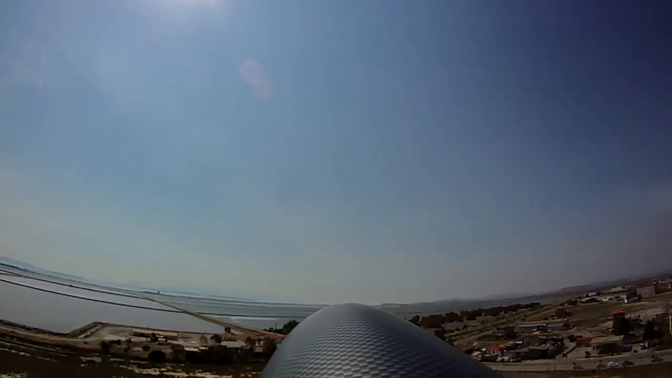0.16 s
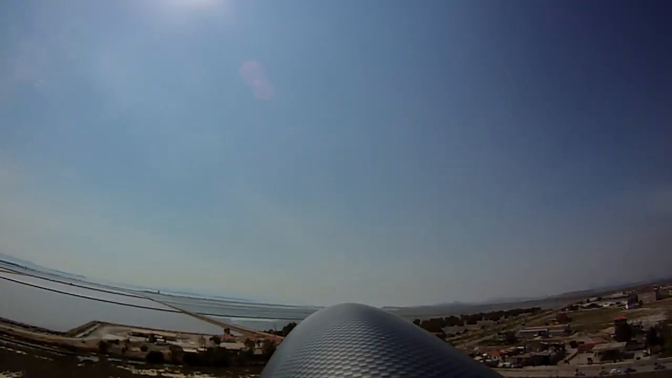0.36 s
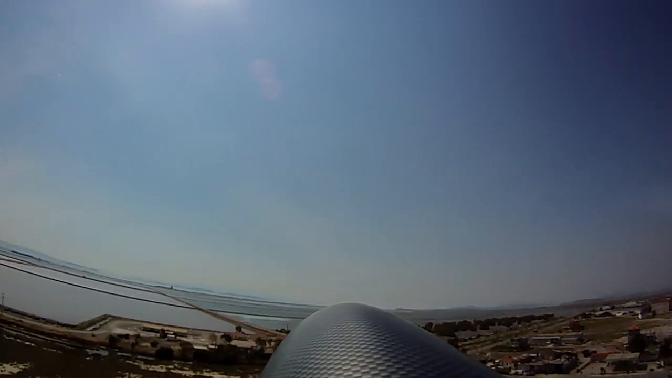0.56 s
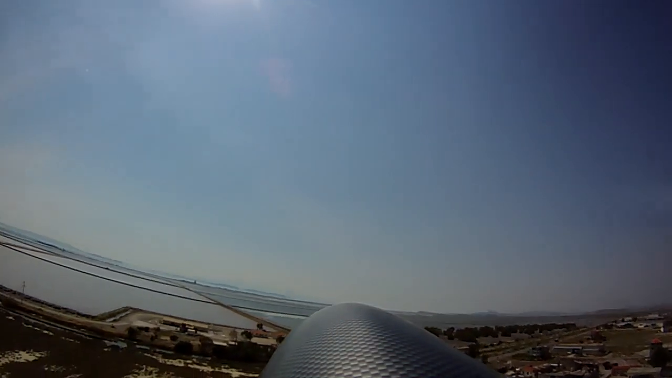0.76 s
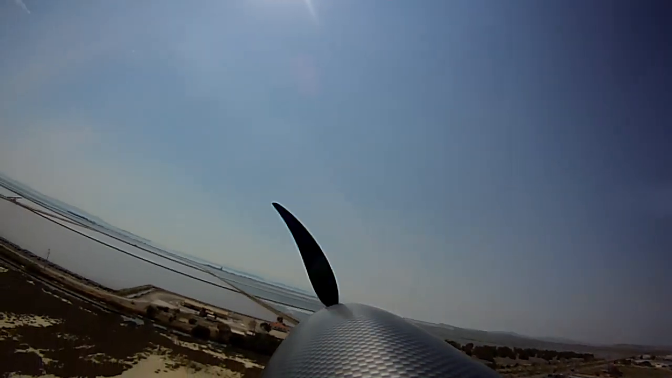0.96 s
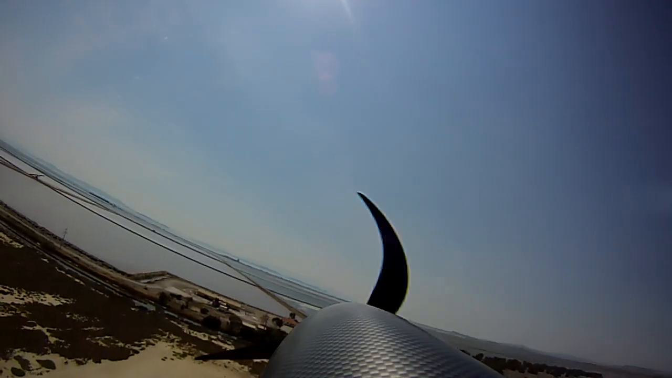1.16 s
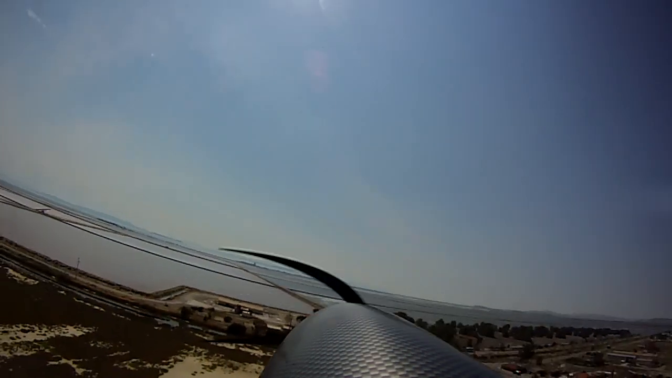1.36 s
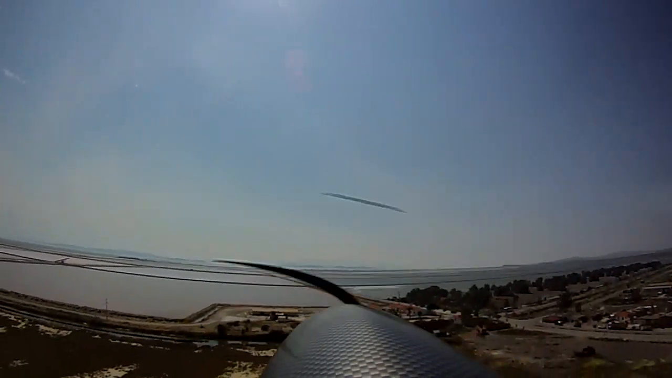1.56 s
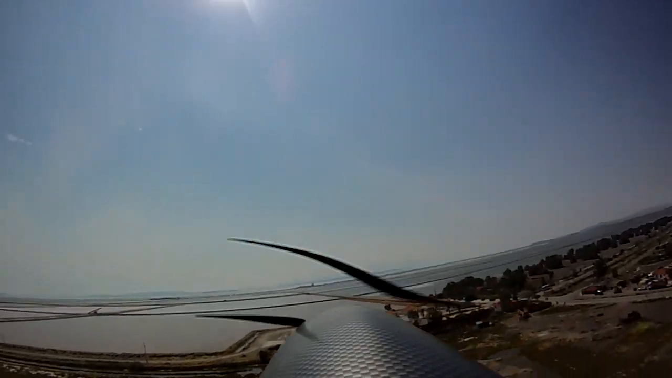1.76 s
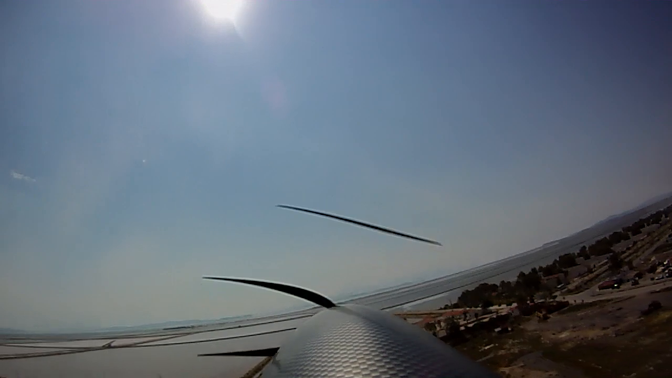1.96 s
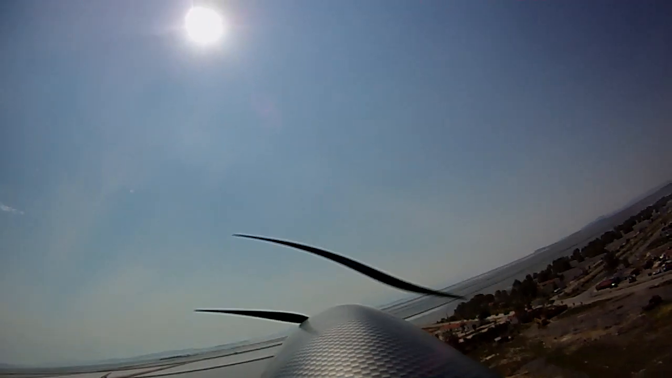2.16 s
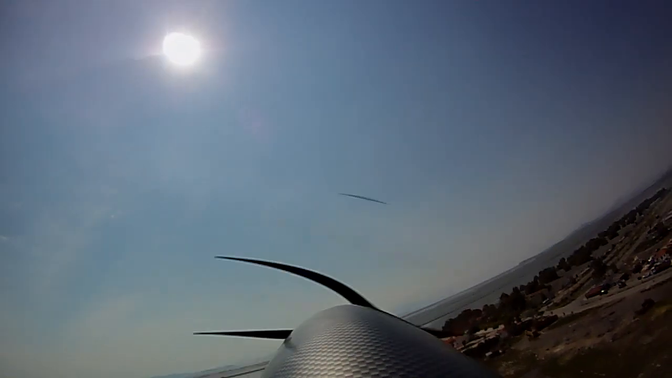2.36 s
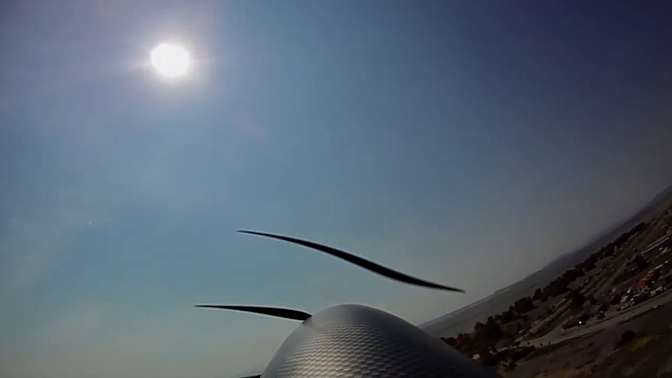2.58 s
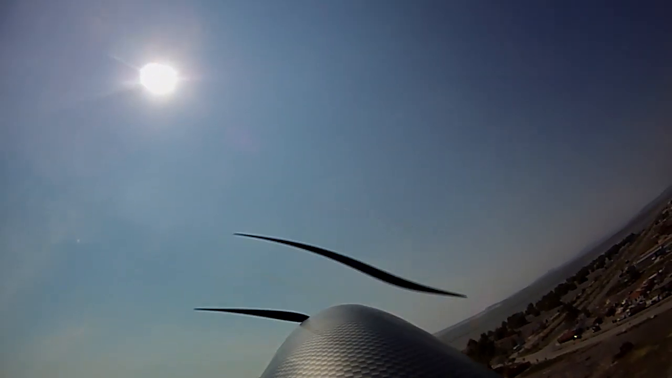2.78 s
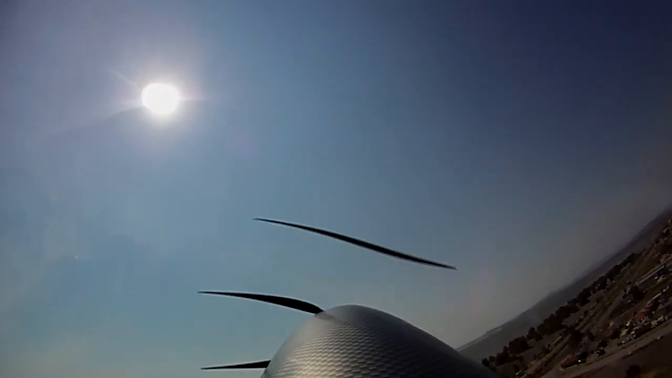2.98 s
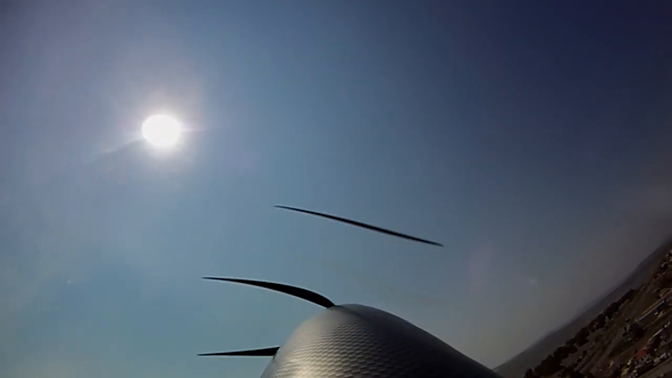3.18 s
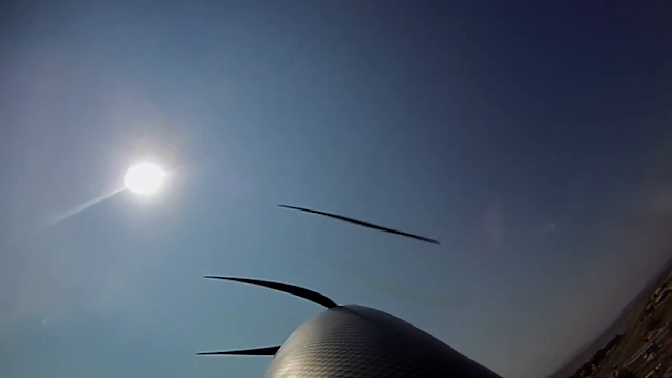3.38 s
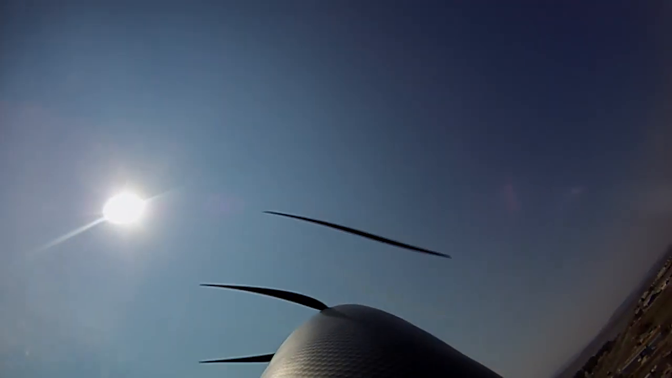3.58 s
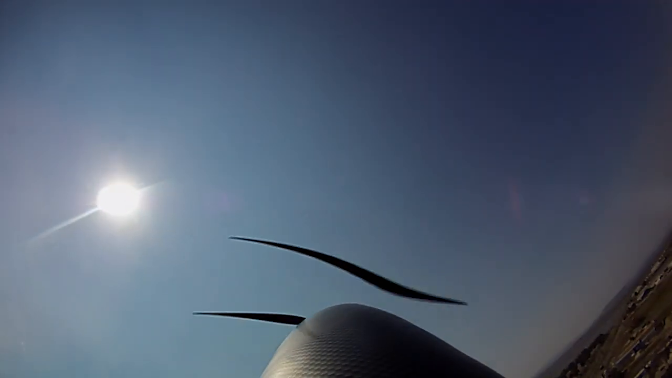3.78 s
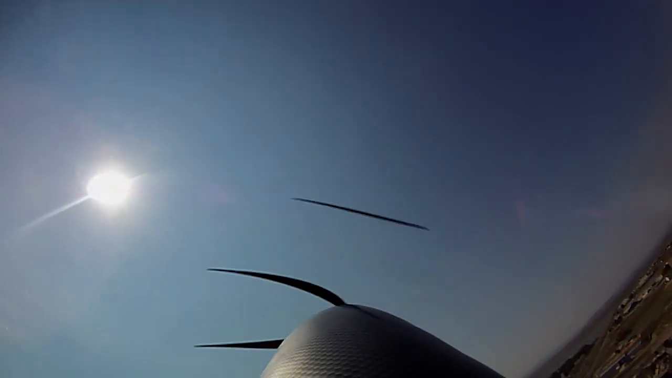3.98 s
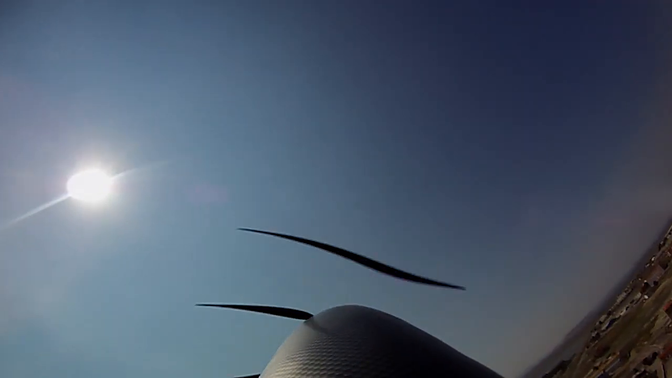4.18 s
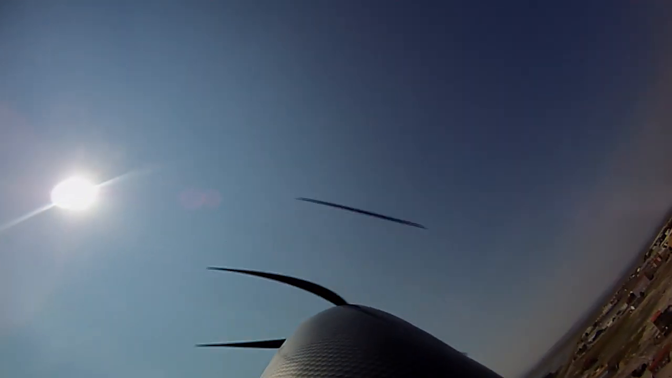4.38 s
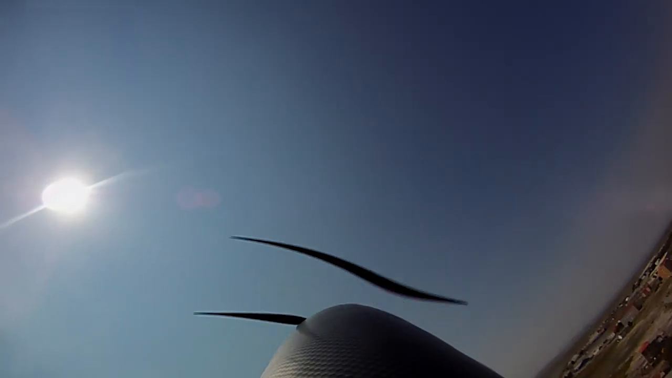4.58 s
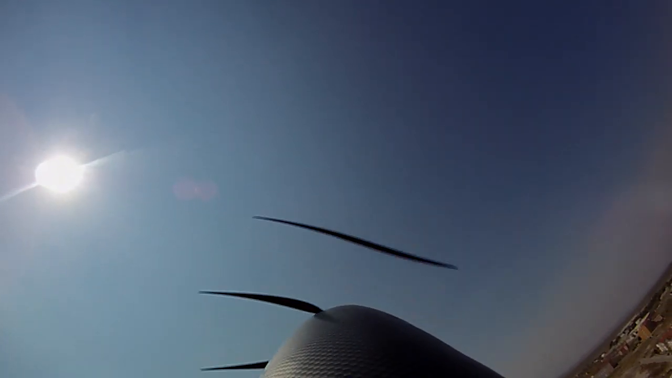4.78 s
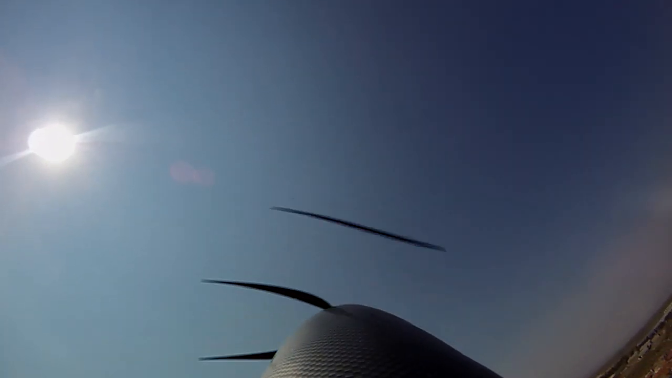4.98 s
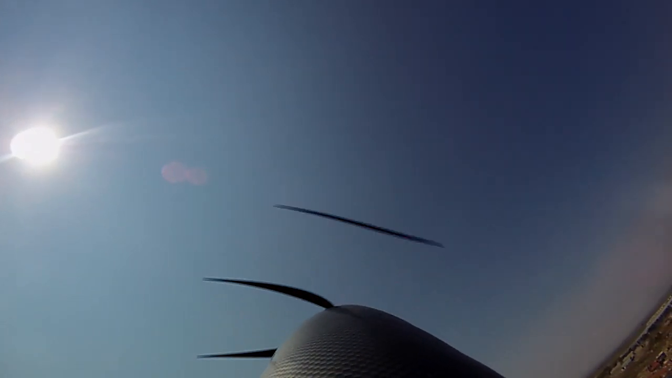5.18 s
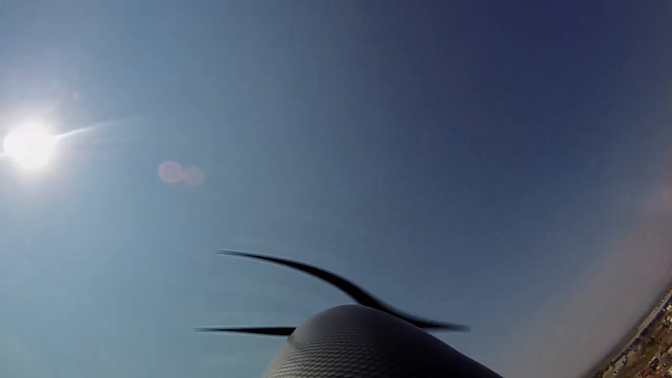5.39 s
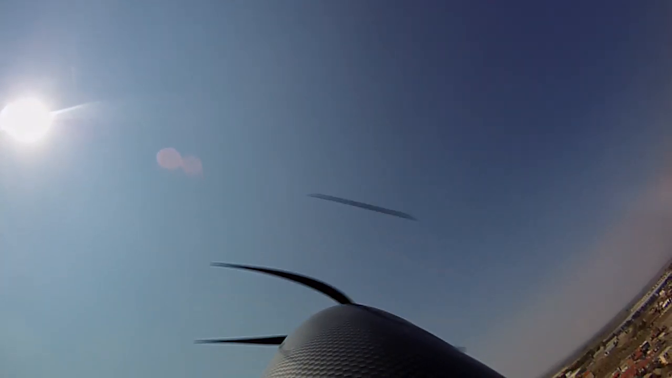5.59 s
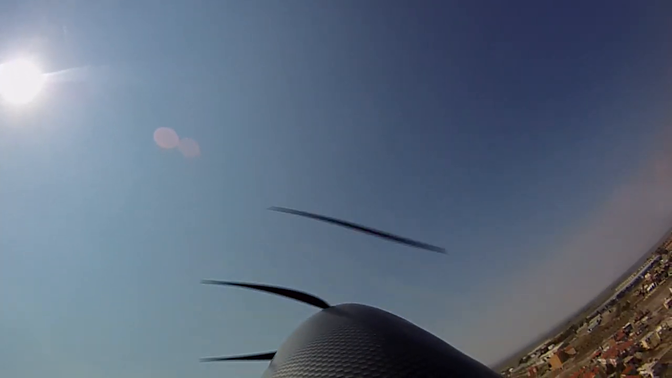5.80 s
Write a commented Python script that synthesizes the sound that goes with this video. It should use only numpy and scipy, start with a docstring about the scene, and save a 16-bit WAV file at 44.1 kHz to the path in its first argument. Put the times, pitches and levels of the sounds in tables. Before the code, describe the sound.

Low airflow flutters and fades, folding blades click open, a small motor whirs up, and a harsh, buffeting propeller drone takes over.

```python
"""Propeller wash buffets a camera microphone on the nose of a model glider: dense one-way pressure spikes,
each crest with a spit of filtered noise, over cosine tones at multiples of the two-blade rate.
Before it, close up: noise-burst clicks as the folding propeller opens, then the electric motor whining up
through the airframe as a sine sweeping across fixed resonances, with a brief buzz and the hiss of the blades.
Behind it all lie the rumble and hiss of the gliding airflow, shaped from noise, and two thin whistles."""
import sys
import numpy as np
from scipy import signal
from scipy.fft import rfft, irfft
from scipy.io import wavfile
from scipy.ndimage import uniform_filter1d

SR = 44100
rng = np.random.default_rng(int(sys.argv[2]) if len(sys.argv) > 2 else 0)


def persist_wave(psi):
    """Save psi, clipped to +-1, as 16-bit WAV."""
    counts = np.round(np.clip(psi, -1, 1) * 32767).astype(np.int16)
    wavfile.write(sys.argv[1], SR, np.atleast_2d(counts).T)


N = 257544
TIME = np.arange(N) / SR  # seconds

# Strength of the wash at the microphone as the glider banks and climbs.
# Each row: time in seconds, level at full throttle in dB.
WASH_LEVEL = [(1.65, -14.5), (1.85, -12.5), (2.2, -11.5), (2.75, -15.5), (3.15, -10), (3.42, -12),
              (3.62, -15.5), (3.95, -12), (4.2, -14.5), (4.9, -14), (5.2, -17.5), (5.84, -15)]
# Spectrum of the wash's pressure. Each row: frequency in Hz, relative density in dB per Hz.
WASH_PRESSURE_SPECTRUM = [(11, -24), (18, 3.5), (128, -4), (181, -6.5), (392, -4), (572, -10), (975, -25.5),
                          (1100, -23), (1430, -41.5), (2420, -120)]
# Spectrum of the hiss torn loose by the wash. Each row: frequency in Hz, relative density in dB per Hz.
WASH_HISS_SPECTRUM = [(500, -2.5), (950, -10.5), (1200, 4), (1500, -2), (2000, -2.5), (2400, -7),
                      (3600, -11.5), (4400, -13), (5300, -17), (6000, -17), (7600, -22), (10000, -31),
                      (11500, -38.5), (15000, -45)]
# The hardest eddies that strike the microphone.
# Each row: time in seconds, relative peak in dB, swell of the stream around it in dB (hiss in full, pressure half).
HARD_BUFFETS = [(1.6826, -1.5, 5), (1.7808, -.5, 4), (1.853, 0, 5), (2.1331, -1, 6), (2.2485, 0, 3),
                (2.4453, -1, 3), (2.5542, -2, 6), (2.6232, -3, 5), (2.7412, -3, 4), (2.89, -1, 4),
                (2.9416, -.5, 5), (3.025, -6, 7), (3.1333, 0, 6), (3.2121, -3, 4), (3.3955, -1, 4),
                (3.4374, 0, 3), (3.5183, -1.5, 5), (3.5687, -2, 4), (3.6635, -1, 4), (3.7364, 0, 5),
                (3.8755, -1, 4), (3.9823, 0, 3), (4.2497, -3, 4), (4.3489, -1, 4), (4.4224, -1, 4),
                (4.5489, -1.5, 4), (4.8523, 0, 4), (4.9666, 0, 4), (5.22, -3.5, 3), (5.3772, -6, 5),
                (5.695, -2, 4)]
# Drone of the two blades. Each row: multiple of the blade rate, level against the wash before levelling in dB.
BLADE_DRONE = [(1, -13), (2, -18), (3, -19.5), (4, -26.5)]
# How the airframe passes the motor on. Each row: frequency in Hz, relative gain in dB.
AIRFRAME_RESONANCES = [(400, -59), (780, -25), (900, -38), (1060, -26), (1230, -23), (1400, -36),
                       (1700, -38), (1900, -53), (2200, -33), (2550, -60), (2850, -39), (3200, -45),
                       (3600, -33), (3900, -49), (4800, -50), (7000, -75)]
# Start-up buzz of the motor. Each row: multiple of the commutation rate, relative level in dB.
BUZZ_PARTIALS = [(1, -4), (3, -15), (4, -7), (5, -15), (6, -10)]
# The motor sings while it pulls hard.
# In order: start in seconds, attack in seconds, end of hold in seconds, release in dB per second.
WHINE_ENVELOPE = (1.21, .025, 1.52, 70)
# The start-up buzz of the motor comes and goes.
# In order: start in seconds, attack in seconds, end of hold in seconds, release in dB per second.
BUZZ_ENVELOPE = (1.225, .04, 1.352, 380)
# Smooth hiss of the blades themselves. Each row: frequency in Hz, relative density in dB per Hz.
BLADE_HISS_SPECTRUM = [(600, -38), (1200, 7), (4000, -2.5), (8000, -13.5), (11000, -22), (15000, -28.5)]
# The blades knock in their hinges. Each row: time in seconds, peak in dB, centre in Hz, width in Hz.
HINGE_KNOCKS = [(.889, -48, 7300, 2500), (.985, -35, 1700, 1200), (.997, -30, 1900, 1400),
                (2.958, -11, 2900, 2000)]
# Airflow as the gliding airframe slows down.
# Each row: time in seconds, relative rumble level in dB, relative hiss level in dB.
GLIDE_LEVELS = [(0, -25.5, -46.5), (.2, -29, -49.5), (.55, -32, -55.5), (.85, -32, -55.5),
                (1, -28.5, -56.5), (1.2, -30, -57)]
# Spectrum of the low flutter at the microphone. Each row: frequency in Hz, relative density in dB per Hz.
GLIDE_RUMBLE_SPECTRUM = [(12, -28.5), (20, -4), (38, -1), (86, -4), (119, -7.5), (160, -10), (198, -7.5),
                         (339, -15), (528, -15), (612, -17.5), (1000, -35.5), (1300, -36), (2200, -120)]
# Spectrum of the hiss from the airframe. Each row: frequency in Hz, relative density in dB per Hz.
GLIDE_HISS_SPECTRUM = [(700, -13), (950, -34), (1100, 4.5), (1230, 1), (1500, -6.5), (2400, -12),
                       (3000, -10.5), (3450, -16), (4050, -10), (4700, -18.5), (6000, -19), (6700, -30),
                       (7800, -25), (9500, -45.5)]
# Faint thin whistles in the airflow. Each row: mean frequency in Hz, rms level in dB.
WHISTLE_TONES = [(10900, -84), (13600, -81.5)]

# The shaft speeds up along an S-curve: turns per second at full throttle, moment of half speed, time constant.
FULL_HZ, HALF_SPEED_S, SPIN_UP_S = 67, 1.375, .0768
# The wash trails the shaft; pressure, hiss and blade hiss grow by so many dB for each dB of shaft speed.
WASH_LAG_S, WASH_GROWTH, HISS_GROWTH, BLADE_GROWTH = 0.052, 2.3, 3.9, 1.18
# The wash hiss: mean level before its fade, share of the wash's swings in dB, start and rate of the fade.
HISS_DB, HISS_SHARE, HISS_FADE_FROM_S, HISS_FADE_DB_PER_S = -30, 0.2, 3.1, 0.67
# Lesser eddies: mean gap, relative peak above the wash, scatter of the peak, swell.
LESSER_GAP_S, LESSER_PEAK_DB, LESSER_SCATTER_DB, LESSER_SWELL_DB = .055, 9, 1.55, 2.5
# Rates up to about which the levels wander.
DRONE_WANDER_HZ, WHINE_WANDER_HZ = 3, 60
# Gains of the motor's two voices, and level of the blade hiss at full throttle.
WHINE_DB, BUZZ_DB, BLADE_DB = -.5, -1.5, -43
# The opening blades swish through the air: moment, width of the bell curve (sigma), rise of the hiss.
SWISH_S, SWISH_WIDTH_S, SWISH_DB = .94, 0.0274, 6
TOP_HZ = 15300  # the treble is cut above this


def wash(turns, eddy_rate=1700, chop=0.19, spit=0.85, stream_db=-0.6):
    """Small eddies push on the microphone one way only; hiss flares on every pressure crest."""
    pressure_db = curves(WASH_LEVEL)[0]
    fade_db = HISS_FADE_DB_PER_S * np.maximum(TIME - HISS_FADE_FROM_S, 0)
    hiss_db = HISS_DB + HISS_SHARE * (pressure_db - pressure_db.mean()) - fade_db
    blade_phase = 2 * np.pi * 2 * turns  # two blades
    swell_db, push = buffets(HARD_BUFFETS + lesser_buffets(pressure_db))

    gust = undb(1.75 * walk(66)) * (1 + chop * np.cos(blade_phase))
    # sparse one-way impulses, eddy_rate per second on average
    eddies = (rng.random(N) < eddy_rate / SR) * rng.random(N)
    stream = steady(colour((eddies - eddies.mean()) * gust, WASH_PRESSURE_SPECTRUM))

    drone = np.zeros(N)
    for multiple, db in BLADE_DRONE:
        level = np.sqrt(2) * undb(db + 0.37 * walk(DRONE_WANDER_HZ))
        drone += level * np.cos(round(multiple) * blade_phase)

    # pressure in units of the wash's own strength
    pressure = undb(swell_db / 2 + stream_db) * stream + drone
    pressure += 1.25 * push / undb(pressure_db)
    # the microphone lets slow pressure leak away
    pressure = steady(butter(pressure, 26, "high", order=1))

    # the flow tears loose on the crests, up to a limit
    crest = 1 + 2 * spit * (1 + np.tanh(0.91 * (pressure - 1)))
    flicker_db = 1.66 * walk(81)
    hiss = colour(noise() * crest * undb(flicker_db + swell_db), WASH_HISS_SPECTRUM)
    hiss = steady(butter(hiss, 670, "high"))

    flow = speed(WASH_LAG_S)
    pressure_part = pressure * undb(pressure_db) * flow ** WASH_GROWTH
    hiss_part = hiss * undb(hiss_db) * flow ** HISS_GROWTH
    return pressure_part + hiss_part


def buffets(rows, swell_s=0.006, core_s=0.00041, suction=0.36, suction_s=0.0015, lag_s=0.0037):
    """Each eddy is a sharp push followed by a shallow suction, and stirs up the stream around it."""
    swell_db, push = np.zeros(N), np.zeros(N)
    sizes = np.exp(0.2 * rng.standard_normal(len(rows)))
    for (s, peak_db, stir_db), size in zip(rows, sizes):
        near = slice(max(int((s - .03) * SR), 0), int((s + .03) * SR))
        age = TIME[near] - s
        # the stirring comes on fast and dies away more slowly
        stir_s = np.where(age < 0, swell_s / 2, swell_s)
        swell_db[near] += stir_db * np.exp(-.5 * (age / stir_s) ** 2)
        core = np.exp(-.5 * (age / (core_s * size)) ** 2)
        trough = np.exp(-.5 * ((age - lag_s) / suction_s) ** 2)
        push[near] += undb(peak_db) * (core - suction * trough)
    return swell_db, push


def lesser_buffets(pressure_db, count=120):
    """Random eddies at uneven gaps, their peaks following the wash: rows like those of HARD_BUFFETS."""
    place, size = rng.random(count), rng.standard_normal(count)
    times = (np.arange(count) + place) * LESSER_GAP_S
    peaks_db = np.interp(times, TIME, pressure_db) + LESSER_PEAK_DB + LESSER_SCATTER_DB * size
    return [(s, db, LESSER_SWELL_DB) for s, db in zip(times, peaks_db)]


def speed(lag_s=0):
    """Shaft speed as a share of full throttle, lag_s earlier."""
    return 1 / (1 + np.exp((HALF_SPEED_S + lag_s - TIME) / SPIN_UP_S))


def motor(shaft_hz, turns):
    """Fourteen magnets and three phases give 42 tugs a turn; overtones sweep the airframe's resonances."""
    steps = 42
    # the rotor is dragged up to speed in slightly uneven steps
    phase = 2 * np.pi * steps * turns + .13 * walk(150)

    def partial(k):
        """One multiple of the tug rate, as the airframe passes it on."""
        return response(k * steps * shaft_hz, AIRFRAME_RESONANCES) * np.sin(k * phase)

    whine = partial(2) * undb(1.5 * walk(WHINE_WANDER_HZ))
    # hard commutation edges buzz only during the first moments
    buzz = np.zeros(N)
    for multiple, db in BUZZ_PARTIALS:
        buzz += undb(db + 2 * walk(WHINE_WANDER_HZ)) * partial(round(multiple))
    buzz = butter(buzz, 4000, "low", order=8)
    return whine * envelope(*WHINE_ENVELOPE, WHINE_DB) + buzz * envelope(*BUZZ_ENVELOPE, BUZZ_DB)


def blades():
    """The blades hiss as soon as they turn, before their wash has built up."""
    return colour(noise(), BLADE_HISS_SPECTRUM) * undb(BLADE_DB) * speed() ** BLADE_GROWTH


def hinges(decay_s=0.00073):
    """Blades knocking in their hinges: short decaying noise bursts, each in its own band."""
    out = np.zeros(N)
    for s, db, hz, width_hz in HINGE_KNOCKS:
        age = np.maximum(TIME - s, 0)
        burst = noise() * (age > 0) * np.exp(-age / decay_s)
        click = butter(burst, [max(hz - width_hz / 2, 100), hz + width_hz / 2], "band")
        out += undb(db) * click / np.abs(click).max()
    return out


def glide():
    """Smooth airflow: a low flutter at the microphone, hiss from the airframe and faint whistles."""
    rumble_db, hiss_db = curves(GLIDE_LEVELS)
    hiss_db = hiss_db + SWISH_DB * np.exp(-.5 * ((TIME - SWISH_S) / SWISH_WIDTH_S) ** 2)
    rumble = steady(colour(noise() * undb(0.85 * walk(35.5)), GLIDE_RUMBLE_SPECTRUM))
    hiss = colour(noise() * undb(1.46 * walk(34)), GLIDE_HISS_SPECTRUM)
    hiss = butter(hiss, 770, "high", order=4)
    hiss = butter(hiss, 14000, "low", order=4)
    floor = undb(-73) * noise()
    return rumble * undb(rumble_db + 2.5) + hiss * undb(hiss_db + 5.5) + floor + whistles()


def whistles():
    """Two thin tones in the airflow that waver together in pitch."""
    waver = np.cumsum(1 + .004 * walk(5) + .002 * walk(200)) / SR
    return sum(undb(db) * np.sqrt(2) * np.cos(2 * np.pi * hz * waver) for hz, db in WHISTLE_TONES)


def undb(db):
    """Decibels to gain."""
    return 10 ** (np.asarray(db) / 20)


def unit(x):
    """Scale to rms 1."""
    return x / np.sqrt(np.mean(x ** 2))


def curves(table):
    """Each column of a table, joined by straight lines in time."""
    s, *columns = np.transpose(table)
    return [np.interp(TIME, s, c) for c in columns]


def response(hz, points):
    """Gain of a (Hz, dB) spectrum at the given frequencies, straight lines over log frequency."""
    f, db = np.transpose(points)
    return undb(np.interp(np.log(hz + 1e-3), np.log(f), db))


def colour(x, points):
    """Filter a signal by the spectrum of the points; rms 1."""
    return unit(irfft(rfft(x) * response(np.arange(N // 2 + 1) * SR / N, points), N))


def butter(x, hz, kind, order=2):
    """Causal low-pass, high-pass or band-pass."""
    return signal.sosfilt(signal.butter(order, hz, kind, fs=SR, output="sos"), x)


def noise():
    """White noise."""
    return rng.standard_normal(N)


def walk(hz):
    """Smooth random wander up to about the given rate; rms 1."""
    return unit(irfft(rfft(noise()) / (1 + (np.arange(N // 2 + 1) * SR / N / hz) ** 4), N))


def steady(x, span=0.15):
    """Keep the quick flutter of a signal and hold its slow level near 1; span in seconds."""
    size = int(span * SR)
    power = uniform_filter1d(uniform_filter1d(x ** 2, size), size)
    return x / np.sqrt(power + 1e-12)


def envelope(start_s, attack_s, end_s, release_db_per_s, db):
    """Gain that rises, holds and dies away."""
    rise = np.clip((TIME - start_s) / attack_s, 0, 1)
    return rise * undb(db - release_db_per_s * np.maximum(TIME - end_s, 0))


def scene():
    """Propeller wash, motor, blades, hinges and airflow at the one microphone."""
    shaft_hz = FULL_HZ * speed()
    # the shaft speed wanders slightly
    turns = np.cumsum(shaft_hz * (1 + 0.00302 * walk(3.55))) / SR
    return (wash(turns) + motor(shaft_hz, turns) + blades() + hinges() + glide())[None]


def record(dry):
    """Peaks beyond full scale are flattened; then the highest treble is cut."""
    clipped = np.clip(dry, -1, 1)
    return signal.sosfilt(signal.ellip(8, .2, 70, TOP_HZ, fs=SR, output="sos"), clipped)


dry = scene()
out = record(dry)
persist_wave(out)
```